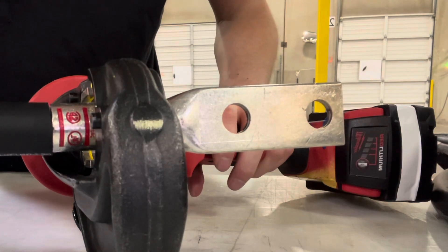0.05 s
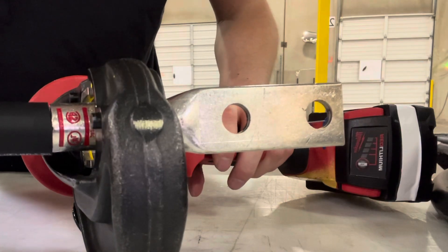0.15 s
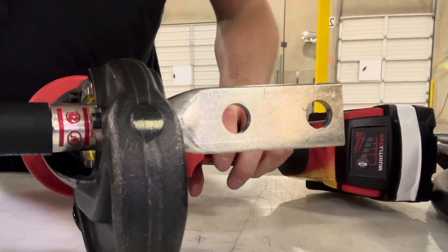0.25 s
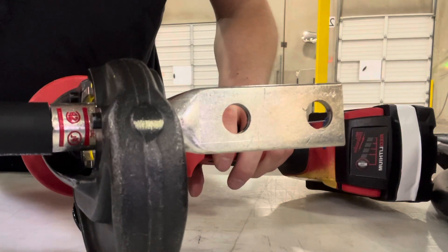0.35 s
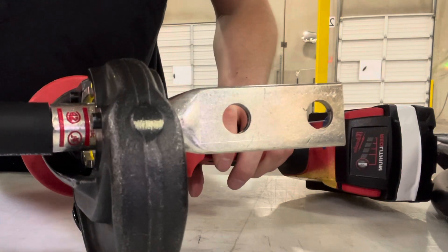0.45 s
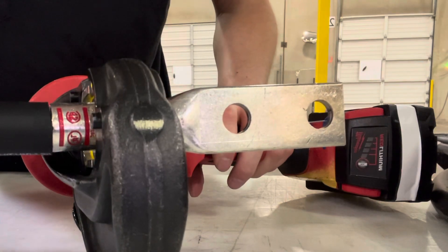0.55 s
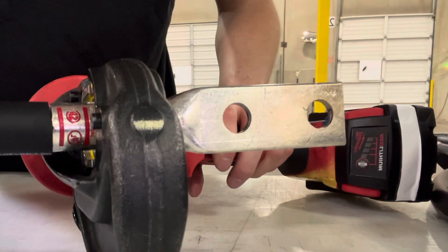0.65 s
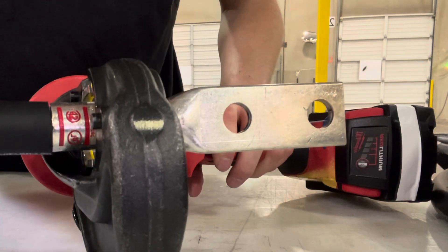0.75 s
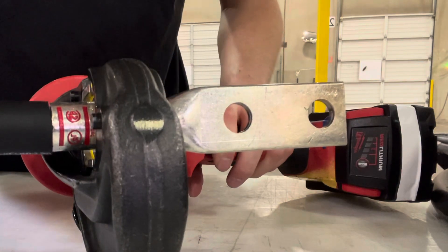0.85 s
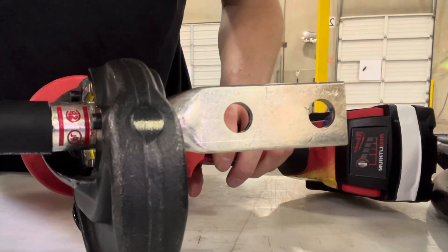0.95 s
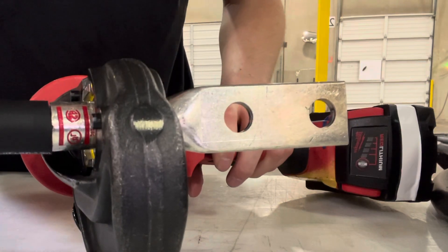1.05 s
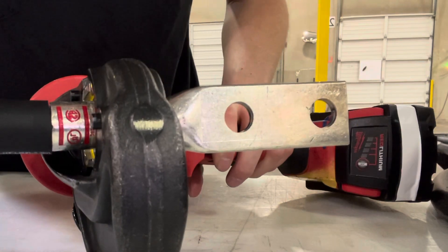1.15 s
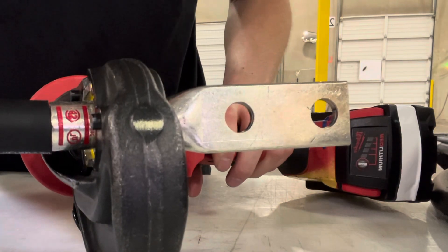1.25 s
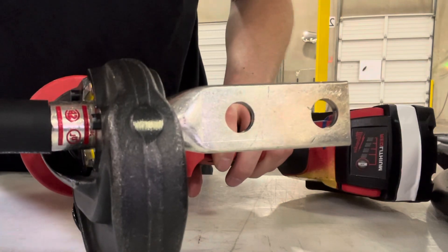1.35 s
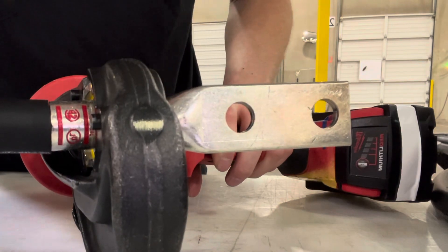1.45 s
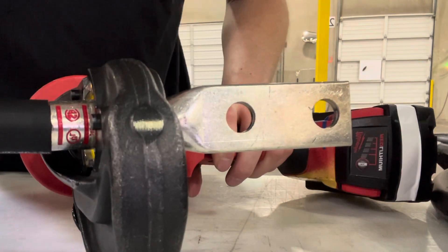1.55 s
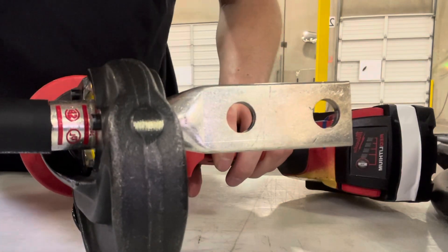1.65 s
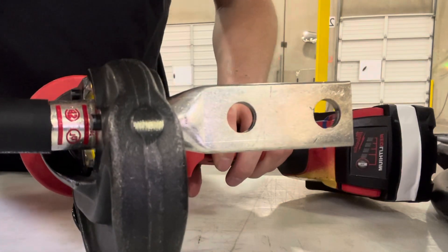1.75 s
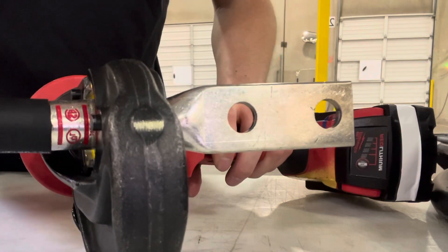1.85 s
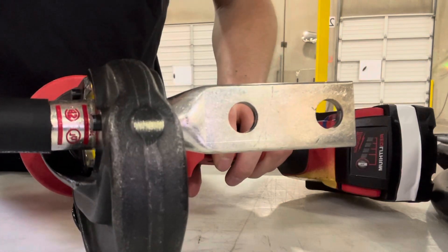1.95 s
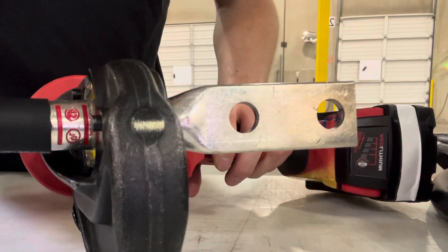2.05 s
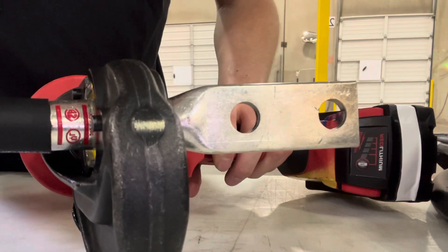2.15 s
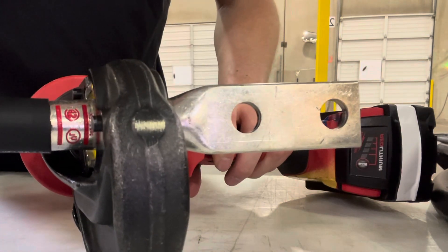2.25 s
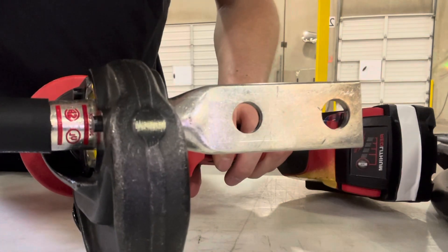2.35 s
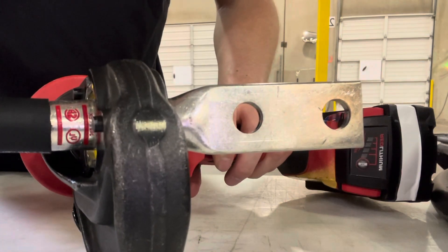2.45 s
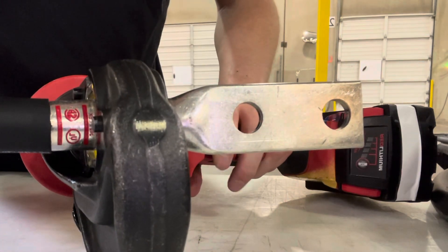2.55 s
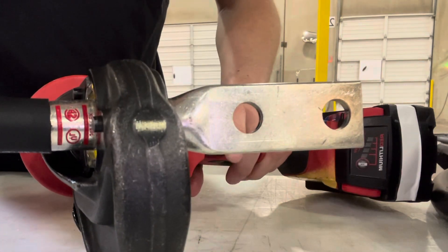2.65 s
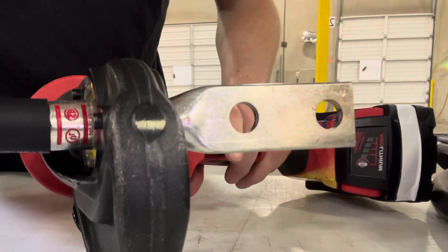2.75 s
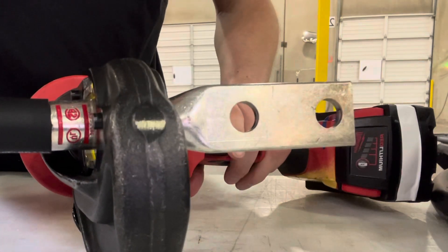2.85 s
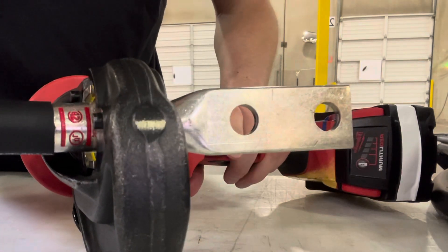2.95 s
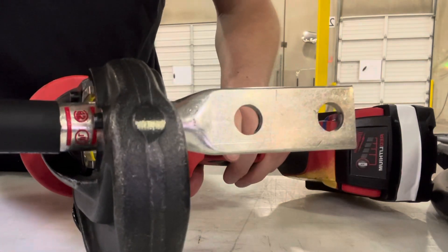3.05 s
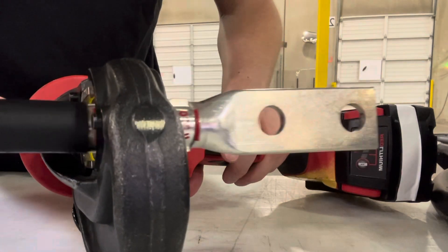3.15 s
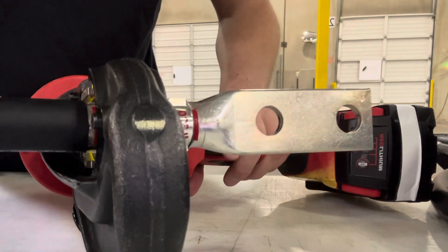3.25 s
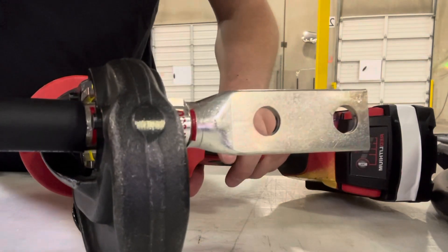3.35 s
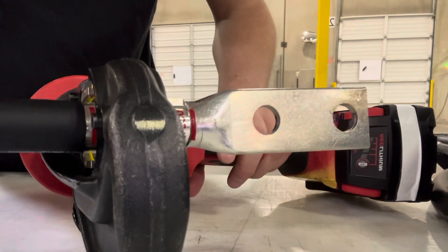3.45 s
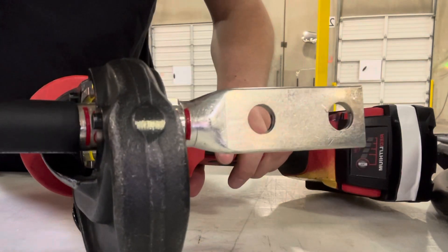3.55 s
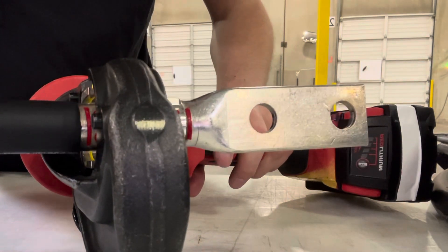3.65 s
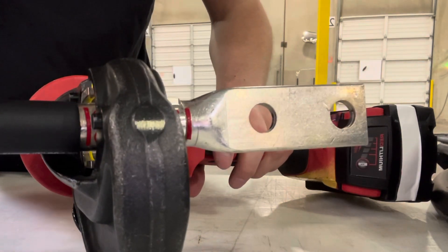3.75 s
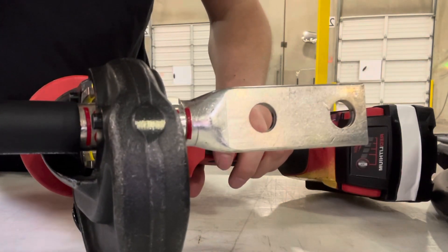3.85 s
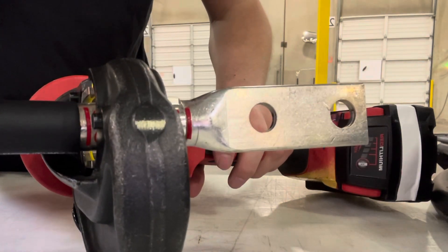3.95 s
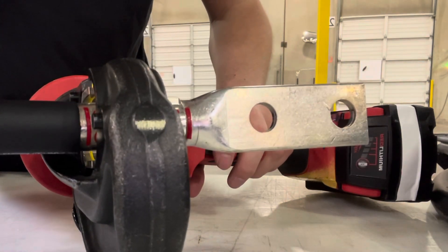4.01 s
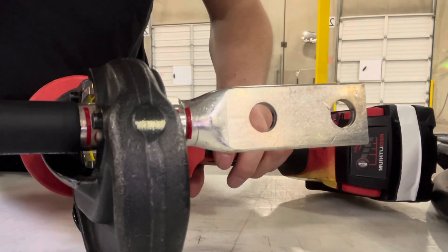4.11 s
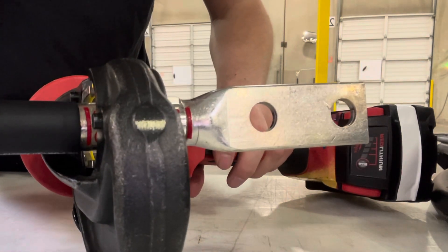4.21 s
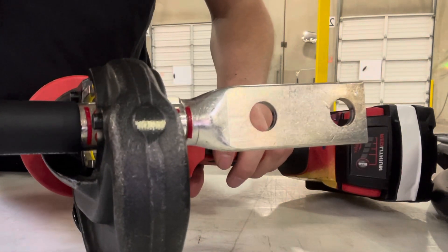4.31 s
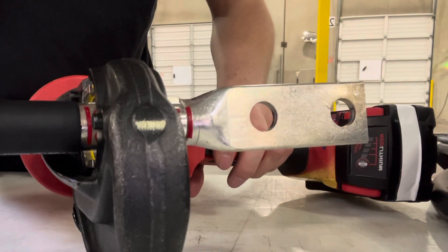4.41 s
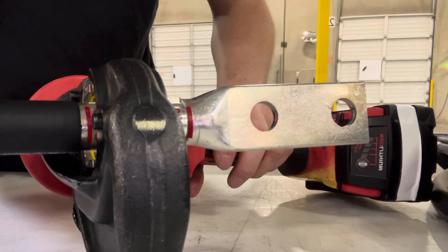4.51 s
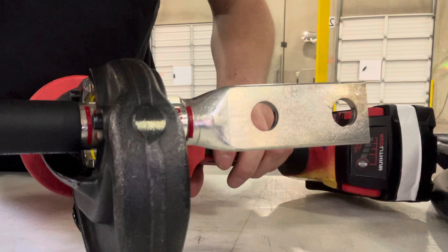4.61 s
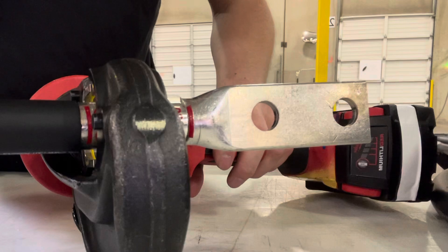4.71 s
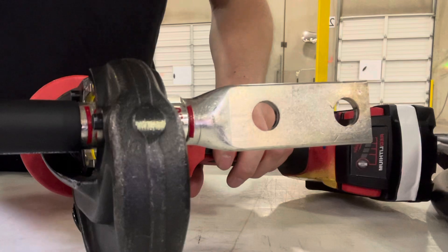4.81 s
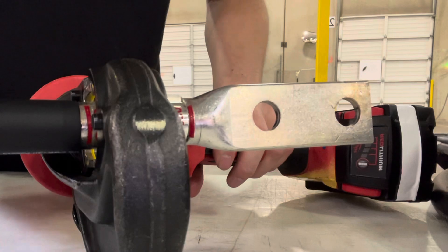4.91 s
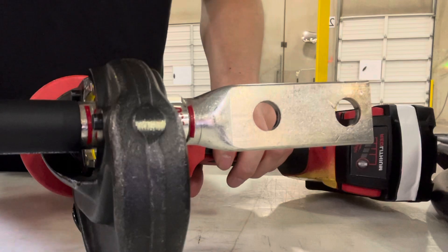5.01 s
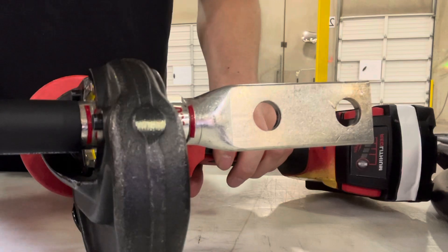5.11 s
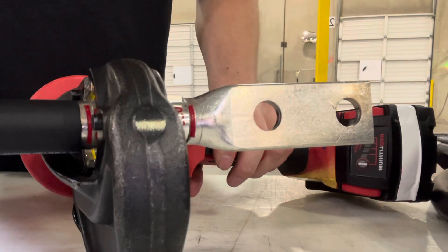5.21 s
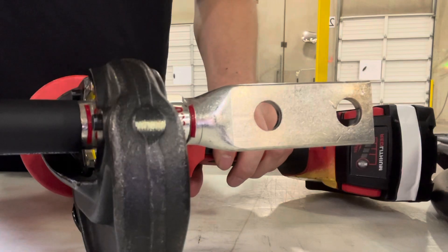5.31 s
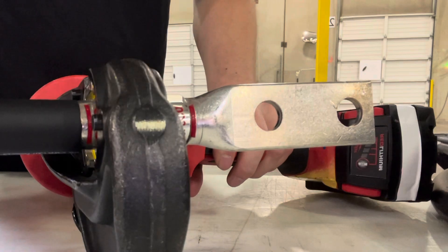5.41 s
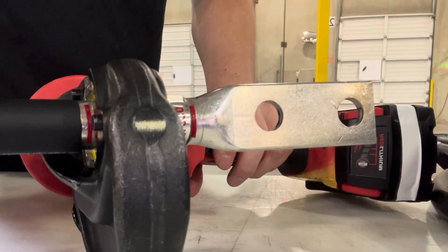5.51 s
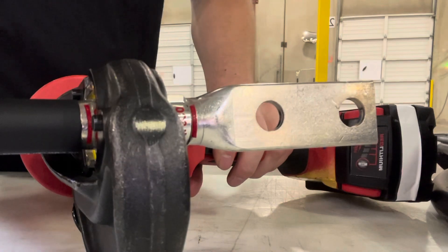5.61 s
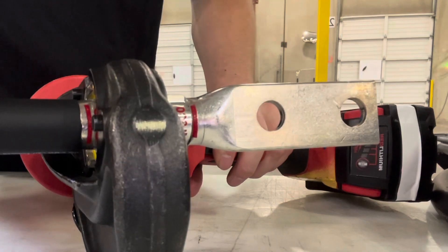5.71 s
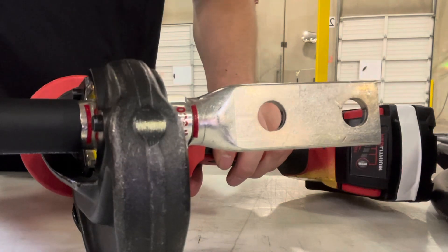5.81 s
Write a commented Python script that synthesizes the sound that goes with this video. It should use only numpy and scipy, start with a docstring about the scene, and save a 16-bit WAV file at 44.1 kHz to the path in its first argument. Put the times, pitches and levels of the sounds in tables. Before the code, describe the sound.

Close to a stereo microphone on a workshop floor, a cordless hydraulic crimper whines and rattles, its pitch sinking as the pump buzzes and snaps against a cable lug. The motor stops with a faint metal ring and a tiny hiss. The lug clicks and knocks in the steel jaws as it is slid along, then a second press starts and sags the same way. Ventilation rumbles quietly behind.

```python
"""A cordless hydraulic crimper on the floor of a workshop hall, close to a stereo microphone.
It opens on the first press: gears whine and rattle, driving a piston pump. As pressure builds on the
cable lug the motor sags and each stroke buzzes, squirts and snaps. The motor stops, the steel head
rings, a short hiss escapes, and the lug clicks in the jaws as it is slid along. The second press
runs to the end. Further off, ventilation rumbles throughout."""
import sys
import numpy as np
from scipy import signal
from scipy.fft import rfft, irfft, next_fast_len
from scipy.io import wavfile
from scipy.ndimage import uniform_filter1d

SR = 44100
rng = np.random.default_rng(int(sys.argv[2]) if len(sys.argv) > 2 else 0)


def unload_audio(sound):
    """Save the sound as a 16-bit wav file, at the path given as the first command line argument."""
    columns = np.transpose(np.atleast_2d(sound))
    # keep every value between -1 and 1, then stretch to whole-number steps
    steps = np.round(np.clip(columns, -1, 1) * 32767)
    wavfile.write(sys.argv[1], SR, steps.astype(np.int16))


N = 258867
TIME = np.arange(N) / SR
STROKES_PER_MESH = 17 / 180  # pump strokes per cycle of the gear whine
SIDES = np.array([[.5], [-.5]])  # splits a left-minus-right level between the channels
# the two presses: motor_on_s, motor_off_s, jaws_touch_s, free_mesh_hz, level_db
PRESSES = [(-.2, 2.424, .58, 947, -0.5), (3.826, 7, 4.25, 943, 0.12)]


def motor(spin_up_s=.028, take_up_s=.005, brake_s=.021, flutter=.00094, full_sag_hz=156.3):
    """The motor sags under load. Gives power, spin, load (0-1) and cam turns, then level and press age."""
    give_hz_per_s, packed_hz_per_s, packed_after_s, knee_s = 39, 144, .83, .12
    press = np.searchsorted([row[0] for row in PRESSES], TIME) - 1
    on, off, touch, free_hz, level_db = np.array(PRESSES)[press].T
    age, squeeze = TIME - on, np.maximum(TIME - touch, 0)
    power = np.clip(1 - (TIME - off) / brake_s, 0, 1) * (1 - np.exp(-age / take_up_s))
    spin = (power > 0) * (1 - np.exp(-(age / spin_up_s) ** 1.6))
    # a slow sag while the hollow barrel gives, a fast one once the strands are packed
    packed = knee_s * np.logaddexp(0, (squeeze - packed_after_s) / knee_s)
    sag_hz = give_hz_per_s * (squeeze - packed) + packed_hz_per_s * packed
    load = np.clip(sag_hz / full_sag_hz, 0, 1) ** .56
    mesh_hz = (free_hz - sag_hz) * spin * (1 + flutter * wander(25))
    turns = np.cumsum(mesh_hz) * STROKES_PER_MESH / SR
    return (power, spin, load, turns), level_db, age


def pump(power, spin, load, turns, chatter_db=1, grain_db=2, snap_spread_db=3.5, drift_db=1.5):
    """Oil fizzes through the valves and rings the head; under load each stroke squirts and snaps."""
    # oil noise over one stroke at full pressure: turn_fraction, squirt_db, spit_db
    stroke_shape = [(0, -3, 0), (.22, -3, 0), (.3, 1, 0), (.48, 2, 0), (.7, -1.5, 0), (.75, -1.5, 6),
                    (.8, -2, 6.5), (.9, -2.8, 1), (1, -3, 0)]
    # pump head resonances: pitch_hz, width_hz, free_db, half_load_db, full_load_db, squirt_depth, snap_db
    head_modes = [(1513, 400, -13, -25, -23.5, .4, -4.5), (2300, 230, -16.5, -16, -22, 1.5, -11),
                  (2800, 220, -34, -10.5, -22, .6, -7.5), (3427, 206, -7.5, -5.5, -6.5, .4, 0),
                  (4025, 90, 0, -6, -15, 0.33, -8.5), (4145, 220, 0.5, -1, -6, 0.5, -1.5),
                  (4634, 280, -20, -12, -5, .8, 5.5), (5160, 245, -8.5, -9.5, -7, 1.6, 4),
                  (6030, 360, -5, -4.5, -7.5, 1, -3), (6665, 490, -10.5, -5, -3, 2.2, -4.5),
                  (7070, 140, -9.5, -2, -15.5, 1.3, -6.5), (7370, 400, -11, -13, -4.5, 1.5, -0.5),
                  (8570, 390, -7, -9, -6.5, 0.98, -2.5), (9590, 480, -10.5, -12, -11.5, 1.1, -4),
                  (10640, 660, -9, -12.5, -11, 1, -3), (11440, 260, -11.5, -14.5, -8, 1.8, 6),
                  (12600, 720, -15.5, -15.5, -12.5, 1, 2), (13900, 900, -10, -12.5, -11.5, 1.1, 0),
                  (14900, 450, -21, -13, -11, 1.3, -0.5)]
    # a broad ring of the jaws, set by how the lug sits in them: time_s, level_db
    jaw_levels = [(0, -2.5), (.55, -3), (1.0, -9.5), (2.4, -12), (3.85, -13), (4.5, -9.5), (5.85, -13)]
    # the whole hiss: free_db, half_load_db, full_load_db
    hiss_levels = [-21.5, -21.5, -19]
    fraction, *shapes = np.transpose(stroke_shape)
    squirt_db, spit_db = (np.interp(turns % 1, fraction, shape) for shape in shapes)
    stroke = turns.astype(int)
    squirt_db = load ** .46 * squirt_db * (1 + .15 * rng.standard_normal(1000))[stroke]
    flow = amp(chatter_db * wander(450) + grain_db * wander(4500))
    # the check valve slams shut three quarters through each turn, spits and strikes the head
    slam = amp(snap_spread_db * rng.uniform(-1, 1, 1000))[stroke]
    snaps = 19 * load ** 3.5 * slam * np.diff(np.floor(turns + 1 / 4), prepend=0)
    spit = slam * flow * np.sqrt(np.maximum(amp(load ** 2 * spit_db) ** 2 - 1, 0))
    # oil and snap reach the resonances by a few separate paths
    paths, size = 4, next_fast_len(N + 4096)
    bins_hz = np.fft.rfftfreq(size, 1 / SR)
    oil = [rfft(noise() * flow, size) for _ in range(paths)]
    valve = []
    for _ in range(paths):
        spray = noise() * spit
        strike = rng.choice([-1, 1], (2, 1)) * np.roll(snaps, rng.integers(SR // 1500))
        valve.append(rfft(spray + strike, size))

    def resonance(spectrum, hz, width_hz):
        """One resonance, whose strength drifts a little."""
        drift = np.interp(TIME, np.linspace(0, TIME[-1], 60), rng.standard_normal(60))
        ringing = irfft(spectrum / (1 + 1j * (bins_hz - hz) / width_hz) ** 2, size)[:, :N]
        return amp(drift_db * drift) * ringing
    hiss = amp(in_time(jaw_levels)) * resonance(oil[2], hz=3696, width_hz=230)
    for k, (hz, width_hz, *levels, depth, snap_db) in enumerate(head_modes):
        excitation = oil[k % paths] + amp(snap_db) * valve[k % paths]
        hiss += by_load(load, levels) * amp(depth * squirt_db) * resonance(excitation, hz, width_hz)
    hiss /= np.sqrt(uniform_filter1d((hiss ** 2).mean(0), size=4000))  # evens out slow level changes
    return power * spin ** .3 * by_load(load, hiss_levels) * hiss


def gear_rattle(power, spin, load, turns, lumpy_db=2, throb=.099):
    """Teeth rattle in the housing, a little harder on each pressure stroke."""
    # housing colour: frequency_hz, density_db
    housing = [(30, -31), (70, -15.5), (115, -8), (200, -9), (370, -14), (550, -3), (730, 3.5), (880, -4.5),
               (1200, -1), (1380, -5.5), (1600, -5.5), (1900, -14), (2350, -9), (3000, -22), (4000, -17.5)]
    # the whole rattle: free_db, half_load_db, full_load_db
    levels = [-31, -33, -37.5]
    force = amp(lumpy_db * wander(400)) * (1 - throb * load * np.cos(2 * np.pi * turns))
    return power * spin ** .3 * by_load(load, levels) * coloured(noise() * force, housing)


def pinion(power, spin, load, turns, teeth_per_stroke=27.65, push_at=.45, push_width=.19, swing=.07):
    """The fast first gear buzzes in one burst per stroke, slowing as the piston pushes."""
    # pinion teeth pressed together: harmonic, free_db, half_load_db, full_load_db
    harmonics = [(1, -62, -43, -52), (2, -52, -39, -41), (3, -47, -33, -33), (4, -58, -46, -41),
                 (5, -58, -46, -45)]
    push = unit(np.exp(-((turns % 1 - push_at) / push_width) ** 2))
    teeth = teeth_per_stroke * (turns + swing * np.cos(2 * np.pi * (turns - push_at)) / (2 * np.pi))
    buzz = sum(by_load(load, levels) * sine_pair(k * teeth) for k, *levels in harmonics)
    return power * spin ** 2 * np.sqrt(2) * push * (1 + .5 * wander(80)) * buzz


def gear_whine(power, spin, load, turns, surge_db=32):
    """The gear mesh sings, hardest while it speeds up; the piston shakes the body about once a stroke."""
    # drive tones: stroke_rate_multiple, free_db, half_load_db, full_load_db
    orders = [(2, -47, -46.5, -46.5), (3, -47.5, -63, -62), (4, -64, -63, -55.5), (5, -68, -66, -61),
              (7, -58, -64, -57), (8, -66, -64, -53), (9.588, -64, -57, -48), (11.588, -64, -57, -48),
              (21.176, -59, -63, -68)]

    def tone(multiple):
        """One sine of rms 1 locked to the cam."""
        return np.sqrt(2) * np.sin(2 * np.pi * (multiple * turns + rng.random()))
    strain = .22 * load ** 3
    mesh = tone(1 / STROKES_PER_MESH) * by_load(load, [-37, -36.5, -37.3])
    mesh *= 1 + .046 * wander(25) + strain * wander(70)
    left_db = 1 - 4 * load  # the whine moves right under load
    mesh = mesh * amp(surge_db * np.minimum(1 - spin, .25) + SIDES * left_db)
    # body shake: free_db, half_load_db, full_load_db
    shake_levels = [-39.5, -46, -58.5]
    shake = tone(.99) * by_load(load, shake_levels) * amp(SIDES)
    tones = sum(tone(k) * by_load(load, levels) * (1 + .22 * wander(11) + strain * wander(30))
                for k, *levels in orders)
    return power ** 4 * (spin ** 1.8 * mesh + spin ** 6 * (shake + tones * amp(4.2 * SIDES)))


def whistles(power, spin, load, turns, waver=.39):
    """Thin overtones of the gear mesh sink with the motor and fade towards full load."""
    # overtones: mesh_rate_multiple, free_db, half_load_db, full_load_db
    overtones = [(7.559, -58, -45, -60), (12, -47, -57, -70), (13, -43, -48, -66), (16, -47, -51, -64)]
    mesh = turns / STROKES_PER_MESH
    tones = sum(by_load(load, levels) * (1 + waver * wander(10)) * sine_pair(k * mesh)
                for k, *levels in overtones)
    return power * spin ** 4 * np.sqrt(2) * tones


def knocks(crack_t60_s=.017, tick_t60_s=.011, tock_t60_s=.063, rise_s=.00026, focus_db=8):
    """Lug on steel jaws, finger on trigger: a crack, a short ring, a tock and thud through the tool."""
    # blows: start_s, crack_db, tick_db, thud_db, crack_focus_hz, tock_db, tock_hz
    blows = [(2.557, -46, -66, -71, 3700, -70, 700), (2.573, -45, -68, -67, 2000, -64, 700),
             (2.5986, -46, -55, -56, 1400, -56, 700), (2.617, -46, -61, -51, 1500, -58, 700),
             (2.739, -49, -68, -47.5, 1400, -45, 520), (2.75, -43, -67, -53, 1800, -50, 520),
             (2.7546, -48, -47, -53, 1800, -54, 520), (2.7728, -49, -55, -64, 3900, -64, 520),
             (2.782, -52, -64, -65, 3300, -66, 520), (2.8193, -49, -62, -57, 3700, -55, 520),
             (2.8668, -53, -60, -60, 1400, -58, 520), (2.959, -41, -50, -47, 4220, -52, 520),
             (2.9614, -45, -56, -46, 4200, -43, 490), (2.974, -48, -68, -57, 4100, -62, 520),
             (2.9868, -44, -70, -44, 1100, -44, 520), (3.031, -48, -62, -62, 1900, -62, 520),
             (3.0849, -43.5, -56, -44.5, 1600, -44, 300), (3.124, -56, -80, -49, 900, -53, 864),
             (3.137, -40, -42, -42, 4150, -50, 880), (3.1652, -38.5, -60, -45, 3350, -46, 540),
             (3.178, -48, -72, -51, 1600, -40, 240), (3.2054, -41.5, -46.5, -48, 1550, -45, 526),
             (3.215, -60, -80, -50, 1550, -49, 150), (3.226, -50, -66, -54, 4100, -60, 520),
             (3.24, -62, -85, -55, 1200, -44, 200), (3.4387, -53, -82, -56, 1600, -66, 520),
             (3.633, -42.5, -76, -62, 3800, -62, 520), (3.716, -42, -76, -63, 3800, -58, 520),
             (3.778, -51, -68, -65, 4000, -66, 520), (3.796, -49, -62, -67, 4500, -68, 520),
             (3.8126, -36, -43, -62, 3600, -62, 520)]
    # modes of the jaws and of the body: pitch_hz, level_db, t60_s
    jaw_modes = [(1480, 1, 0.048), (2100, -1, 0.024), (3360, -3, 0.072), (3920, 3, 0.048), (4340, -6, .03)]
    body_modes = [(168, 2, 0.11), (226, -0.5, 0.07), (375, -3, 0.043), (540, 0, 0.057), (296, -2, 0.097),
                  (850, -12, 0.035)]
    # contact noise, a crack and its bright tick: frequency_hz, density_db
    crack_colour = [(500, -20), (1000, 4), (1500, 0), (2500, -4.5), (3300, -4), (4200, 4.5), (5000, -12),
                    (7000, -19), (10000, -35)]
    tick_colour = [(3530, -32), (5300, -7), (6200, -6), (7010, -1), (7710, -5), (11600, -6), (16000, -21)]
    out, t = np.zeros((2, N)), np.arange(8192) / SR
    for start_s, crack_db, tick_db, thud_db, focus_hz, tock_db, tock_hz in blows:
        contact = filtered(noise(len(t)), lambda hz: amp(focus_db / (1 + ((hz - focus_hz) / 350) ** 2)))
        crack = coloured(contact, crack_colour) * decay(crack_db - 5, t, crack_t60_s)
        tick = coloured(noise(len(t)), tick_colour) * decay(tick_db + 3.5, t, tick_t60_s)
        click = (crack + tick) * (1 - np.exp(-t / rise_s))
        thud = amp(thud_db + 1) * struck(body_modes, t)
        tock = decay(tock_db, t, tock_t60_s) * np.sin(2 * np.pi * tock_hz * t)
        ring = amp(crack_db - 25) * struck(jaw_modes, t)
        body = amp([[0], [-8]]) * (thud + tock)  # weaker in the side signal
        start = round(start_s * SR)
        out[:, start:start + len(t)] += click + ring + body
    return out


def struck(modes, t, spread_db=3.5, detune=.061):
    """Damped modes of rms 1 over the first 10 ms; each blow lands on another spot."""
    ring = sum(decay(db + spread_db * rng.standard_normal(), t, t60)
               * sine_pair(hz * (1 + detune * rng.uniform(-.88, 1)) * t) for hz, db, t60 in modes)
    ring *= 1 - np.exp(-t / .0006)
    return ring / ring[:, :SR // 100].std()


def release(start_s=2.703, length_s=.037, edge_s=.005, swell_db=15):
    """A short hiss swells and is cut off as the ram lets go."""
    # hiss colour: frequency_hz, density_db
    colour = [(880, -45), (1500, -9), (1740, -37), (1850, -26), (3410, -10), (6240, -8), (10700, -6),
              (16000, -11)]
    t = TIME - start_s
    gate = np.clip(np.minimum(t, length_s - t) / edge_s, 0, 1)
    level_db = -42.5 + swell_db * (np.clip(t / length_s, 0, 1) - 1)
    return gate * amp(level_db) * coloured(noise(), colour)


def head_ring():
    """The steel head rings on when the motor stops after the first press."""
    # head modes: pitch_hz, level_db, t60_s
    modes = [(3550, -56, 0.4), (4570, -58.5, 0.27), (6896, -60, .3)]
    t = np.maximum(TIME - PRESSES[0][1], 0)
    return (t > 0) * sum(decay(db, t, t60) * sine_pair(hz * t) for hz, db, t60 in modes)


def near_echoes(x, echo_db=-14, latest_s=.014, count=8):
    """Floor, jaws and hands throw back quick echoes, which give the rasp a metallic grain."""
    taps = np.zeros((2, SR // 20))
    for row in taps:
        gains = rng.choice([-1, 1], count) * amp(echo_db) / np.sqrt(count)
        delays = (rng.uniform(.1, 1, count) * latest_s * SR).astype(int)
        row[delays] = gains
    taps[:, 0] = 1
    return signal.oaconvolve(x, taps / np.linalg.norm(taps[0]), axes=1)[:, :N]


def microphone(pair):
    """Direct and scattered sound reach the two ports with their own level and phase; power is kept."""
    # the tool at the ports: frequency_hz, coherence, left_lead_rad, left_minus_right_db
    ports = [(80, 0.8, 3.5, -0.5), (200, 0.3, -0.9, 14), (393, 0.7, 0.7, -2), (640, 1, -2.9, 7.5),
             (930, 0.82, 1.88, -1), (1324, 0.6, -2, 4.5), (1560, 0.9, 0.9, -3), (2180, 0.04, 2.6, 2),
             (2610, 0, 0.5, 4.5), (2660, 0.7, 1, -3), (3430, 0.56, 3, 4.5), (3894, 0.65, 1.5, 5.5),
             (4410, 0.85, 3.5, 5), (4860, 0.1, 1, 9), (5570, 0.5, 2, -3.5), (6410, 0.3, 3.5, 5.5),
             (6900, 0.7, 1.5, 14.5), (7800, 0.1, 3.5, -8.5), (8800, 0.9, 4, 6.5), (10460, 0.3, 5.5, 1.5),
             (11230, 0.6, 7.5, 11), (12800, 0.7, 4, -0.5), (14050, 0.5, 3.5, 8), (15150, .78, 3.5, 5)]

    def response(hz):
        """Gains of direct and scattered sound at each port."""
        coherence, lead, left_db = (at_hz(np.array(ports)[:, [0, k]], hz) for k in range(1, 4))
        coherence, left = np.clip(coherence, 0, .995), amp(left_db)
        right_port = [coherence * np.exp(-1j * lead), np.sqrt(1 - coherence ** 2)]
        return np.array([[left, 0 * left], right_port]) / np.sqrt((1 + left ** 2) / 2)
    return filtered(pair, response).sum(1)


def hall(x, wet_db=-27.5):
    """The hall returns a faint long tail whose treble dies first."""
    # reverberation: frequency_hz, t60_s
    decay_times = [(100, 1.0), (780, 0.82), (1400, 0.97), (4000, 0.5), (8000, 0.5), (16000, 0.45)]
    hz, t, spectra = signal.stft(noise(SR), SR, nperseg=256)
    tail = signal.istft(spectra * decay(0, t, at_hz(decay_times, hz)[:, None]), SR, nperseg=256)[1]
    return amp(wet_db) * signal.fftconvolve(x, tail / np.linalg.norm(tail[0]), axes=1)[:, :N]


def ventilation(swell_db=1.8, hum_hz=735):
    """Ventilation rumbles in the hall, with one faint tone."""
    # rumble colour: frequency_hz, density_db
    colour = [(25, -39), (55, -23), (80, -8), (110, 1.5), (180, -2.5), (330, -6.5), (520, -17),
              (780, -19.5), (1400, -28), (2200, -39.5), (4000, -40.5), (6000, -46.5), (13000, -54.5),
              (16000, -64)]
    # room tone: time_s, level_db
    levels = [(2.5, -52), (2.702, -52.5), (3.08, -49), (3.27, -46.5), (3.8, -47)]
    level_db = in_time(levels)
    rumble = amp(level_db - 2.96 + swell_db * wander(18)) * coloured(noise(), colour)
    phase_drift = np.array([wander(9.3), wander(8)])
    return rumble + amp(level_db - 19) * np.sin(2 * np.pi * hum_hz * TIME + phase_drift)


def amp(db):
    """Decibels to gain."""
    return 10 ** (np.asarray(db) / 20)


def decay(db, t, t60):
    """A gain that starts at db and falls 60 dB in t60 seconds."""
    return amp(db - 60 * t / t60)


def by_load(load, levels_db):
    """Gain between the levels for no, half and full load."""
    return amp(np.interp(load, [0, .5, 1], levels_db))


def unit(x):
    """Scales to rms 1."""
    return x / np.sqrt(np.mean(x ** 2) + 1e-20)


def at_hz(points, hz):
    """Reads a table on a log-frequency axis."""
    f, value = np.transpose(points)
    return np.interp(np.log(hz + 1), np.log(f + 1), value)


def in_time(points):
    """Reads a time curve at every sample."""
    return np.interp(TIME, *np.transpose(points))


def filtered(x, response):
    """Applies a frequency response, given as a function of Hz."""
    size = next_fast_len(x.shape[-1] + 4096)
    return irfft(rfft(x, size) * response(np.fft.rfftfreq(size, 1 / SR)), size)[..., :x.shape[-1]]


def coloured(x, spectrum):
    """Gives x a spectrum, at rms 1."""
    return unit(filtered(x, lambda hz: amp(at_hz(spectrum, hz))))


def noise(samples=N):
    """Two unrelated white noises."""
    return rng.standard_normal((2, samples))


def sine_pair(cycles):
    """One sine at two random phases."""
    return np.sin(2 * np.pi * (cycles + rng.random((2, 1))))


def wander(hz):
    """A smooth random curve of rms 1 that changes about hz times a second."""
    return unit(filtered(rng.standard_normal(N), lambda f: 1 / (1 + (f / hz) ** 4)))


def spread(pair, side_db, left_db):
    """A stereo image from a mid and a side signal."""
    return (pair[0] + 2 * SIDES * amp(side_db) * pair[1]) * amp(left_db * SIDES)


def scene(rush_db=3, settle_s=.8):
    """The tool close to the microphone, the hall behind it."""
    state, level_db, age = motor()
    rush = amp(rush_db * np.exp(-age / settle_s))  # the oil is louder after switch-on, then settles
    rasp = gear_rattle(*state) + pinion(*state) + rush * pump(*state)
    running = amp(level_db) * (microphone(near_echoes(rasp)) + gear_whine(*state) + whistles(*state))
    tool = running + spread(knocks() + release() + head_ring(), side_db=1, left_db=3)
    return tool + hall(tool) + spread(ventilation(), side_db=-8.5, left_db=1.5)


def record(dry, edge_hz=15900):
    """The recorder's band limit."""
    lowpass = signal.firwin(511, edge_hz, window=("kaiser", 9), fs=SR)
    return signal.oaconvolve(dry, lowpass[None], "same")


dry = scene()
out = record(dry)
unload_audio(out)
```